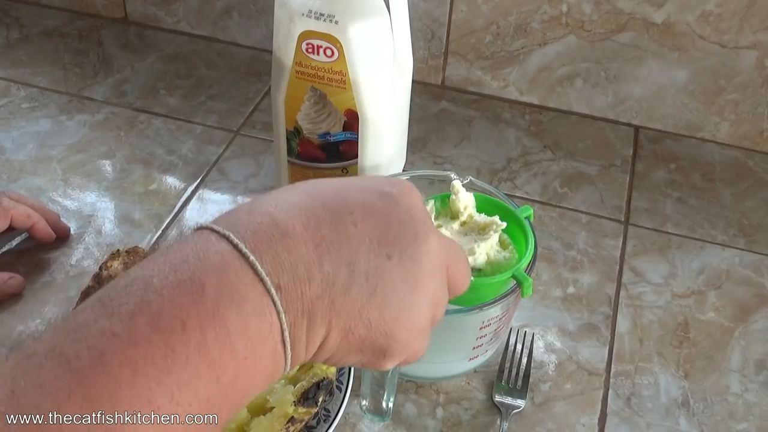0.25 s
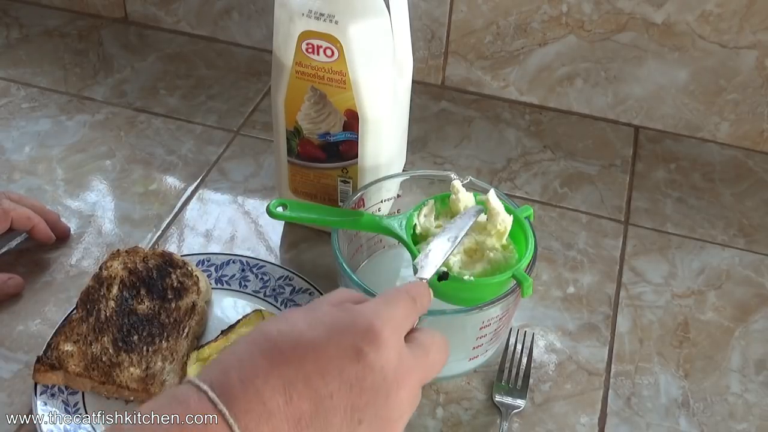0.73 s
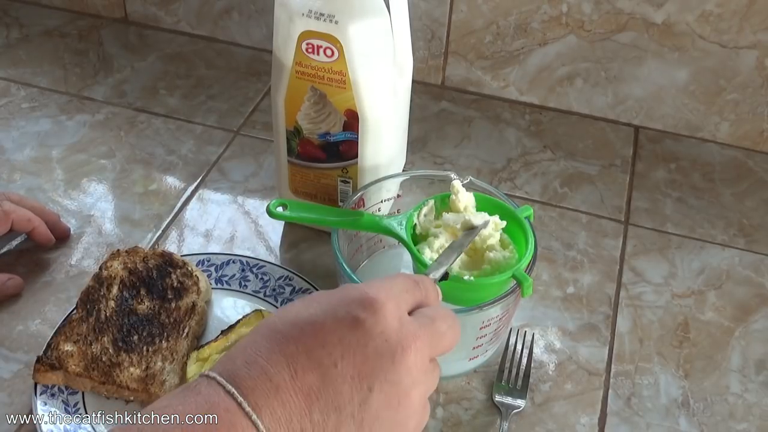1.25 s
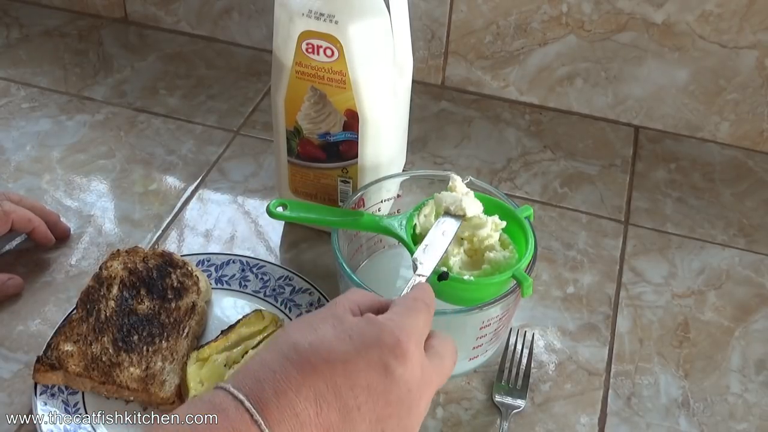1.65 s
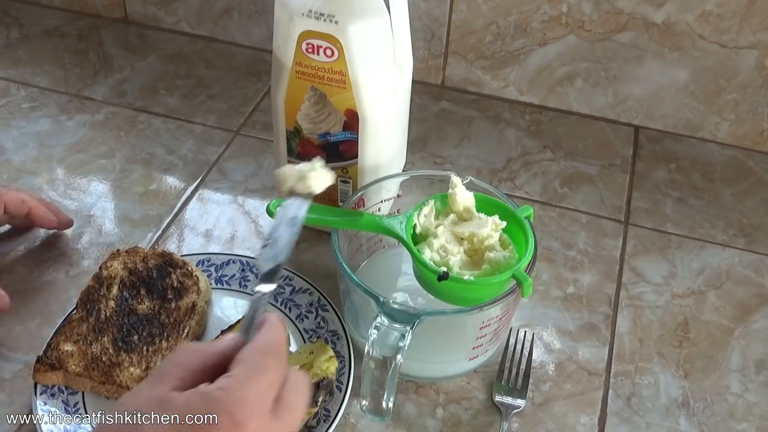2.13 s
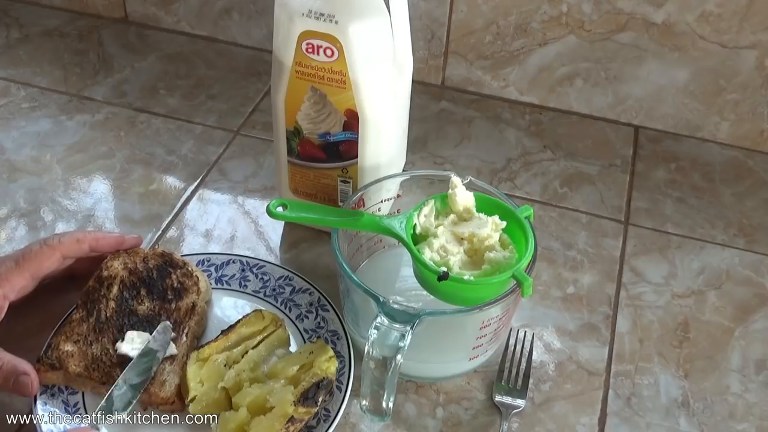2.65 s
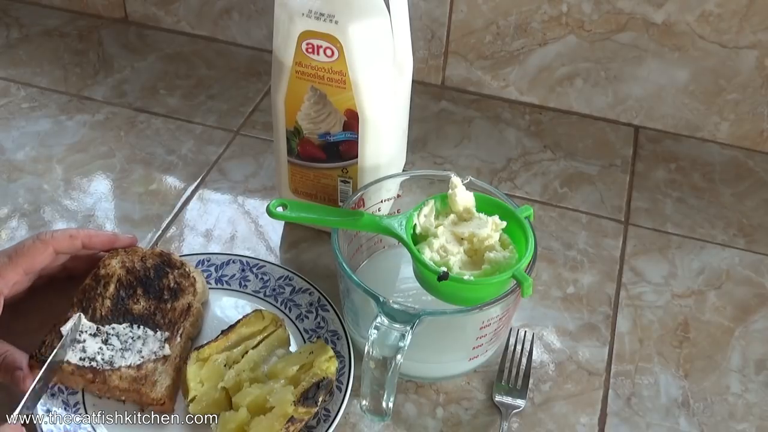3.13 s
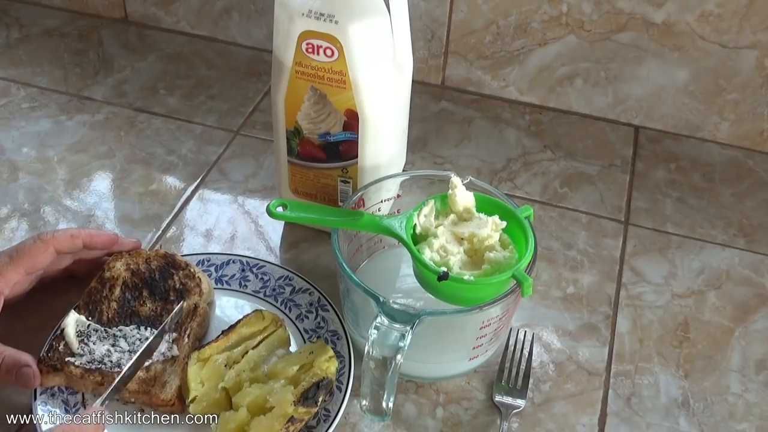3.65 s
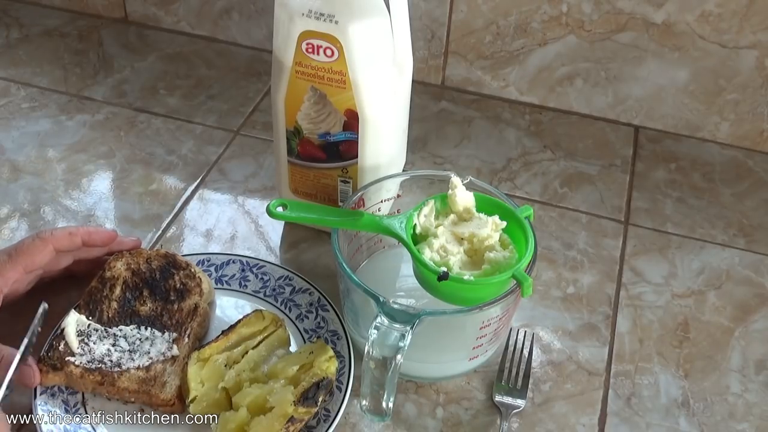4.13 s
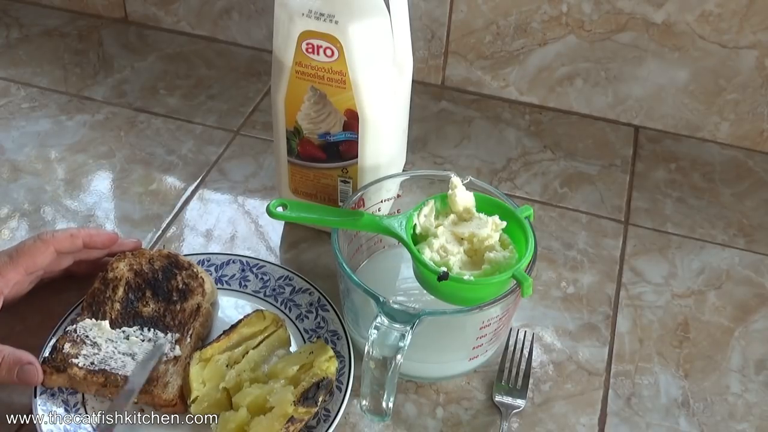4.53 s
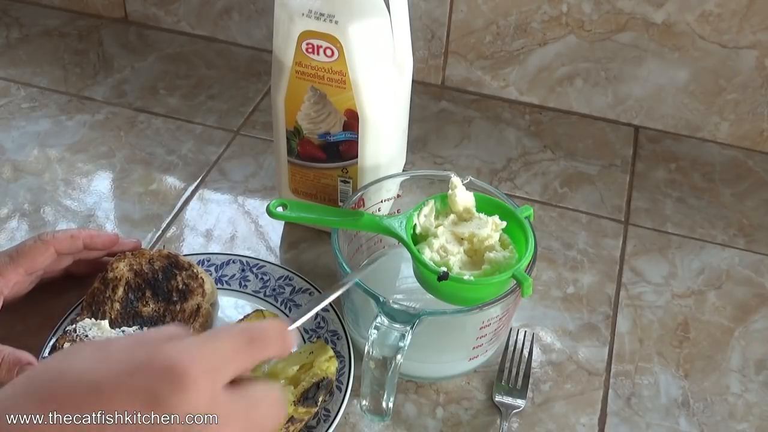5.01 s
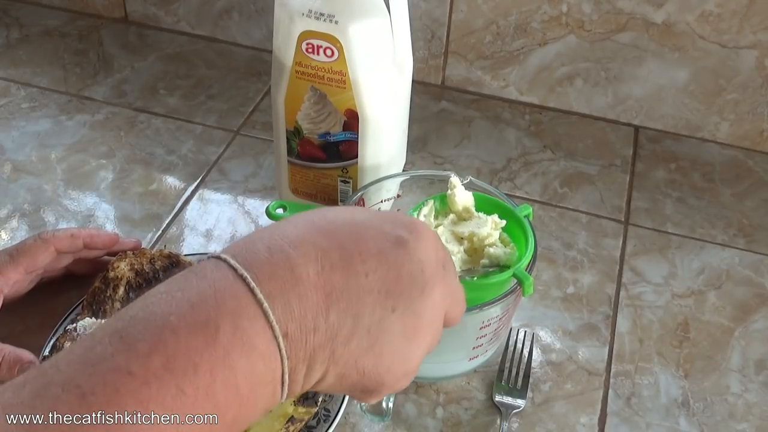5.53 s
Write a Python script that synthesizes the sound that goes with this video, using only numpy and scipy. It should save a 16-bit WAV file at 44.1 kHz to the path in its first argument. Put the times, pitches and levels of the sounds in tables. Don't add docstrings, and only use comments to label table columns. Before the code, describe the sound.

Outdoors in a walled yard, sparrows chirp constantly with a short echo. Close to the microphone, a hand knocks a plastic strainer on a glass jug and rustles softly. Then a knife scrapes hard toast in two crunchy bouts, the second full of fine crumb ticks, before the hand knocks the jug again. Soft puffs of wind come early.

```python
import sys
import numpy as np
from scipy import signal
from scipy.fft import rfft, irfft, next_fast_len
from scipy.io import wavfile
from scipy.ndimage import uniform_filter1d

SR = 44100
rng = np.random.default_rng(int(sys.argv[2]) if len(sys.argv) > 2 else 0)


def generate_wav(sig):
    pcm = np.round(np.clip(np.atleast_2d(sig).T, -1, 1) * 32767).astype(np.int16)
    wavfile.write(sys.argv[1], SR, pcm)


def rack_gain(trim_db):
    fader = np.asarray(trim_db, float)
    return 10 ** (fader / 20)


N = 254533


def rms_one(x):
    return x / np.sqrt(np.mean(x ** 2) + 1e-20)


def bandpass(x, order, low_hz, high_hz):
    return signal.sosfilt(signal.butter(order, [low_hz, high_hz], "band", fs=SR, output="sos"), x)


def level_in(x, low_hz, high_hz):
    part = bandpass(x, 4, low_hz, high_hz)
    return x / np.sqrt(np.mean(part ** 2))


def colour(x, spectrum):
    hz, level_db = np.transpose(spectrum)
    size = next_fast_len(N)
    grid = np.maximum(np.arange(size // 2 + 1) * SR / size, 1)
    gain = rack_gain(np.interp(np.log(grid), np.log(hz), level_db))
    return irfft(rfft(x, size) * gain, size)[..., :N]


def drift(rate_hz):
    r = np.exp(-2 * np.pi * rate_hz / SR)
    wander = signal.lfilter([1], [1, -2 * r, r * r], rng.standard_normal(N + SR))
    return rms_one(wander[SR:])


def swells(rows, column, rise_db_per_s, fall_db_per_s):
    t, rows = np.arange(0, N, 40) / SR, np.array(rows)
    start, end = rows[:, :1], rows[:, :1] + rows[:, 1:2]
    loss_db = rise_db_per_s * np.maximum(start - t, 0) + fall_db_per_s * np.maximum(t - end, 0)
    power = rack_gain(2 * (rows[:, [column]] - loss_db)).sum(axis=0)
    return np.interp(np.arange(N) / SR, t, np.sqrt(power))


def resonances(x, modes):
    out = 0
    for k, (hz, width, level_db) in enumerate(modes):
        r = np.exp(-np.pi * width / SR)
        poles = [1, -2 * r * np.cos(2 * np.pi * hz / SR), r * r]
        ring = signal.lfilter([(1 - r * r) / 2, 0, (r * r - 1) / 2], poles, x)
        out = out + (-1) ** k * rack_gain(level_db) * ring
    return out


def grains(per_s, spread_db, smooth):
    sizes = rack_gain(spread_db * np.minimum(rng.exponential(1, N), 3)) * rng.choice([-1, 1], N)
    born = rng.random(N) < per_s / SR
    clumps = rack_gain(1.5 * np.clip(drift(60), -2, 2))
    return (rms_one(sizes * born) + smooth * rng.standard_normal(N)) * clumps


def echoes(x, t60, side_db, first_s):
    t = np.arange(SR) / SR
    patches = rack_gain(3.5 * rng.standard_normal(SR // 100)).repeat(100)
    scatter = rng.standard_normal((2, SR)) * patches
    tail = scatter * rack_gain(-60 * t / t60) * np.clip(t / first_s, 0, 1)
    tail = tail / np.sqrt(np.sum(tail ** 2, axis=1, keepdims=True))
    mid, side = signal.fftconvolve(x[None], tail, axes=1)[:, :N]
    return mid + rack_gain(side_db) * side * [[1], [-1]]


def whistles(notes, overtone_db, flutter, burr):
    out = np.zeros((2, N))
    breath, shake = np.minimum(drift(135), 2.1), drift(263)
    chance = rng.random((len(notes), 2))
    for (start, length, first, middle, last, peak_db), (side, turn) in zip(notes, chance):
        at = round(max(start, 0) * SR)
        u = np.linspace(-1, 1, round(length * SR))[:N - at]
        now = slice(at, at + len(u))
        hz = middle + u * (last - first) / 2 + u ** 2 * ((first + last) / 2 - middle)
        phase = 2 * np.pi * (np.cumsum(hz * (1 + burr * shake[now])) / SR + turn)
        tone = np.sin(phase) + rack_gain(overtone_db) * np.sin(2 * phase)
        shape = np.abs(np.cos(u * np.pi / 2)) ** 0.15 * rack_gain(peak_db + flutter * breath[now])
        pan = rack_gain(4 * (side - .5) * np.array([[1], [-1]]))
        out[:, now] += tone * shape * pan
    return out


# hz, level_db (per Hz)
AIR_SPECTRUM = [(15, -33), (25, -3.5), (53, -15.5), (94, -9), (308, -8), (800, -11), (1600, -13),
                (2500, -11), (4600, -4), (7000, -14), (10000, -19), (14600, -35.5), (15900, -24.5)]


def air():
    mid, side = colour(rng.standard_normal((2, N)), AIR_SPECTRUM)
    hum = rack_gain(-60.0) * np.sin(2 * np.pi * 49.5 * np.arange(N) / SR)
    bed = rms_one(mid + 0.41 * side * [[1], [-1]])
    return rack_gain(-47) * bed * rack_gain(.9 * drift(1.3)) + hum


# start_s, length_s, pitch_hz, peak_db
RISING = [(.607, 0.037, 6400, -38), (.64, 0.036, 5636, -35), (.723, 0.032, 4230, -36.5),
          (1.076, 0.026, 5290, -31), (1.278, 0.046, 4500, -31.5), (1.614, 0.015, 4760, -39),
          (2.112, 0.045, 4880, -38.5), (2.344, 0.02, 5100, -31), (2.793, 0.017, 4070, -30.5),
          (3.329, 0.017, 5530, -28.5), (3.348, 0.018, 5550, -37), (3.718, 0.0097, 4250, -37),
          (3.815, 0.088, 2960, -57), (3.907, 0.083, 5370, -37.5), (4.024, 0.027, 4270, -28),
          (4.995, 0.057, 4300, -36), (5.378, 0.019, 5080, -33.5), (5.526, 0.02, 6210, -23)]
# start_s, length_s, pitch_hz, peak_db
ARCHED = [(0, 0.035, 4326, -38.5), (0, .07, 3150, -46.5), (.031, 0.029, 4700, -37),
          (1.205, 0.04, 5615, -27), (1.408, 0.029, 5200, -42.5), (1.579, 0.043, 5670, -41),
          (1.656, 0.055, 3920, -44), (1.923, 0.017, 6580, -38.5), (1.949, 0.017, 4670, -34),
          (2.158, 0.027, 2880, -47), (2.357, 0.024, 5756, -23.5), (2.436, 0.023, 4835, -29),
          (1.312, 0.053, 4760, -37), (.396, .05, 5680, -51), (3.394, 0.034, 5640, -41),
          (3.19, 0.03, 4800, -36), (3.575, 0.035, 6830, -46), (3.852, 0.0097, 4420, -42),
          (3.887, 0.016, 6490, -33.5), (3.955, 0.022, 5920, -28.5), (3.985, 0.026, 5700, -33),
          (4.225, 0.02, 6750, -47), (4.518, 0.016, 5700, -38.5), (4.545, 0.038, 5120, -42),
          (4.793, 0.017, 4010, -36), (4.914, 0.055, 5760, -40.5), (5.033, 0.042, 4830, -36.5),
          (5.246, 0.03, 7800, -49), (5.355, 0.022, 6480, -35), (5.606, 0.023, 4940, -21),
          (2.312, 0.023, 7340, -47)]
# start_s, length_s, pitch_hz, peak_db
FALLING = [(.307, 0.015, 4920, -33.5), (.311, 0.029, 3850, -41), (.388, 0.019, 4180, -41),
           (.662, 0.088, 4400, -40), (.788, 0.068, 4960, -35.5), (1.688, 0.028, 6080, -35),
           (1.76, 0.013, 5150, -30.5), (2.436, 0.036, 6570, -36.5), (2.544, 0.022, 4430, -31),
           (3.928, 0.062, 4840, -36), (4.291, 0.046, 4340, -39), (5.549, 0.034, 6130, -29),
           (5.556, 0.015, 5170, -33), (5.657, 0.031, 2980, -41), (5.636, 0.019, 4420, -40)]
# start_s (into the phrase), length_s, first_hz, middle_hz, last_hz, level_db
PHRASE = [
    (0, 0.024, 3460, 4200, 4400, -9.5),
    (0.012, .032, 4690, 4820, 4910, 2.5),
    (0.046, 0.017, 3740, 3694, 3340, -4),
    (.071, .03, 3450, 3670, 3600, -7.5),
    (.1, 0.0246, 3370, 3030, 2620, -17.5),
]
# start_s, level_db, closing_db (extra on the closing notes)
REPEATS = [
    (1.09, -21.5, 4.5),
    (3.343, -19.5, 1.5),
    (4.063, -22, 3.5),
]


def sparrows():
    bends = [(RISING, .9, 1.02), (ARCHED, .975, .99), (FALLING, 1.03, .9)]
    chirps = [(s, length, hz * first, hz, hz * last, peak_db)
              for notes, first, last in bends for s, length, hz, peak_db in notes]
    slurs = [(s + .7 * length, .035, last, last, .74 * last, peak_db - 9.5)
             for s, length, first, middle, last, peak_db in chirps]
    yard = whistles(chirps + slurs, overtone_db=-27, flutter=5, burr=.02)
    phrases = [(at + s, length, first, middle, last, loud_db + level_db + closing_db * (s > .05))
               for at, loud_db, closing_db in REPEATS
               for s, length, first, middle, last, level_db in PHRASE]
    nearest = whistles(phrases, overtone_db=-22, flutter=3.5, burr=.01)
    wet = (rack_gain(-0.5) * yard + rack_gain(-7.0) * nearest).mean(axis=0)
    return rack_gain(-1.5) * yard + nearest + echoes(wet, t60=.52, side_db=-7.5, first_s=.003)


# start_s, length_s, level_db, centre_hz
FLOCK = [(0, 0.16, -33.5, 4900), (0.308, 0.24, -40.5, 4614), (0.668, 0.11, -37.5, 5176),
         (0.807, 0.25, -32, 4606), (1.078, 0.34, -31.5, 4633), (1.686, 0.13, -29.5, 4830),
         (1.888, 0.081, -35, 4900), (2.112, 0.12, -43, 4464), (2.375, 0.13, -33.5, 5110),
         (2.573, 0.31, -31, 4730), (2.97, 0.062, -37.5, 5194), (3.12, 0.098, -26, 5210),
         (3.319, 0.18, -26.5, 4634), (3.63, 0.2, -34, 4790), (3.896, 0.3, -30.5, 4808),
         (4.221, 0.16, -30.5, 4896), (4.466, 0.24, -35, 4750), (4.784, 0.32, -33.5, 4806),
         (5.353, 0.24, -38, 5230), (5.53, 0.24, -39.5, 5490)]


def flock():
    s, length, level_db, centre = np.transpose(FLOCK)
    draw = rng.random((1100, 5))
    start = draw[:, 0] * (N / SR - .05)
    octaves = .7 * (draw[:, 1] + draw[:, 4] - 1.03)
    middle = np.interp(start, s + length / 2, centre) * 2 ** octaves
    first, last = middle * (1 - 0.1873 * draw[:, 3]), middle * (1 - 0.284 * draw[:, 2])
    notes = np.transpose([start, 0.01498 + 0.023 * draw[:, 2], first, middle, last, -6 * draw[:, 3]])
    chatter = whistles(notes, overtone_db=-26, flutter=3, burr=.03).mean(axis=0)
    blur = echoes(chatter, t60=0.21, side_db=-7, first_s=0.1)
    crowding = np.sqrt(uniform_filter1d(np.mean(blur ** 2, axis=0), size=SR // 8) + 1e-4)
    hiss = [(5500, -12), (7200, 1), (10000, 1.0), (13000, -43)]
    breath = rms_one(colour(rng.standard_normal(N), hiss))
    bouts = swells(FLOCK, column=2, rise_db_per_s=340, fall_db_per_s=137)
    return bouts * (rack_gain(-5.5) * blur / crowding + rack_gain(-26.0) * breath)


# start_s, length_s, rustle_db, fine_hiss_db
RUMMAGE = [(0, 0.015, -52.5, -62), (.125, 0.077, -42, -52.5), (.3, 0.13, -58.5, -60.5),
           (.92, 0.042, -49.5, -52), (1.12, 0.032, -48.5, -42), (1.23, 0.076, -53.5, -51),
           (1.39, 0.14, -54, -60), (1.51, 0.023, -69, -76), (1.68, 0.062, -85, -51),
           (1.79, 0.094, -53, -65), (2.36, 0.14, -84, -52.5), (2.95, 0.14, -63, -58),
           (3.93, 0.2, -58.5, -50), (4.15, 0.069, -56.5, -80), (5.51, 0.024, -50.5, -53.5)]
# hz, level_db (per Hz)
RUSTLE_SPECTRUM = [(250, -3), (500, 2), (1000, -0.5), (2000, -3), (3500, -6.5), (7000, -30)]
# pitch_hz, level_db, t60_s
JUG = [(735, 5, 0.16), (815, 6, 0.16), (900, 1, 0.06), (1700, 14, 0.045), (2300, 14, 0.025),
       (2690, 11, 0.05), (3480, 12, 0.028), (4500, 9, 0.02), (6500, 3, .05)]


def rummaging():
    touch = grains(1500, 3.3, smooth=2.04)
    body = resonances(touch, [(hz, 120.0, level_db) for hz, level_db, t60 in JUG])
    rustle = level_in(colour(touch + rack_gain(-5.0) * body, RUSTLE_SPECTRUM), 1070, 3100)
    fine = colour(touch, [(5000, -18), (8000, 5.0), (11000, -2.0), (15500, -30)])
    fine = level_in(fine, 11600, 18500)
    rustle_moves = swells(RUMMAGE, column=2, rise_db_per_s=264, fall_db_per_s=165)
    fine_moves = swells(RUMMAGE, column=3, rise_db_per_s=304, fall_db_per_s=128.5)
    return rustle_moves * rustle + rack_gain(-13.5) * fine_moves * fine


# start_s, peak_db, low_share_db, hollow_db (extra on the jug's hollow ring)
KNOCKS = [
    (.077, -24, 0.5, 0),
    (.102, -27.5, 0, 1),
    (.1225, -14, -33, -1),
    (.833, -38, 4, 0),
    (2.975, -24.5, -17, -1),
    (5.3555, -18, -75, 7),
    (5.4025, -22, -66, -2),
]


def knocks():
    out, t = np.zeros(N), np.arange(SR // 5) / SR
    chance = rng.standard_normal((len(KNOCKS), len(JUG)))
    crack = bandpass(rng.standard_normal((len(KNOCKS), len(t))), 3, 900, 6500)
    contact = np.minimum(t / .001, 1)
    thud = np.sin(2 * np.pi * 270 * t) * rack_gain(-60 * t / 0.031)
    for k, (s, peak_db, low_db, hollow_db) in enumerate(KNOCKS):
        rings = 0
        for (hz, level_db, t60), c in zip(JUG, chance[k]):
            ring_db = level_db + 2 * c + hollow_db * (hz < 1e3) - 60 * t / t60
            rings = rings + rack_gain(ring_db) * np.sin(2 * np.pi * hz * t)
        bright = rings / np.abs(rings).max() + .7 * crack[k] * rack_gain(-60 * t / .018)
        share = np.clip(rack_gain(low_db / 2), 0, 1)
        hit = rack_gain(peak_db) * contact * ((1 - share) * bright + share * thud)
        at = round(s * SR)
        out[at:at + len(t)] += hit[:N - at]
    return out


# start_s, length_s, level_db
GUSTS = [
    (.08, 0.035, -49),
    (.24, 0.25, -43.5),
    (.63, 0.15, -42),
    (.9, 0.29, -56.5),
    (1.18, 0.048, -46),
    (1.3, 0.033, -35),
    (1.36, 0.023, -38),
    (2.33, 0.078, -53),
]


def wind():
    rumble = [(15, -7), (35, -0.5), (90, -1.5), (200, -12.5), (500, -35.5), (2000, -80)]
    mid, side = colour(rng.standard_normal((2, N)), rumble)
    ports = mid + .2 * side * [[1], [-1]]
    lumps = rack_gain(4.1 * drift(4.8))
    return swells(GUSTS, column=2, rise_db_per_s=169, fall_db_per_s=303) * rms_one(lumps * ports)


# start_s, length_s, peak_db, sharp_hz (above the usual pitch)
UPPER_STEPS = [(2.017, 0.099, -52, -1), (2.126, 0.024, -43, -3), (2.24, 0.11, -56.5, 0),
               (2.411, 0.092, -49, 73), (2.57, 0.1, -53, 1), (2.77, 0.12, -48, -1.5),
               (2.96, 0.15, -58.5, -6), (3.07, 0.13, -52, 11.5), (3.28, 0.11, -49, 4),
               (3.53, 0.063, -47, 1), (3.64, 0.057, -64, -13), (3.75, 0.09, -49.5, 0),
               (4.021, 0.049, -55.5, -11), (4.16, 0.11, -53, -92), (4.31, 0.087, -54, 24),
               (4.41, 0.069, -48.5, 10), (4.5, 0.065, -52.5, -88), (4.62, 0.13, -53, -39.5),
               (4.75, 0.11, -58, -36.5), (4.89, 0.11, -56.5, -23), (5.05, .1, -76, -16)]
# start_s, peak_db
LOWER_STEPS = [
    (1.991, -47),
    (2.174, -48),
    (2.257, -49),
    (2.408, -47),
    (2.97, -57),
    (3.687, -50.5),
    (4.139, -60),
    (4.235, -49.5),
    (4.854, -54),
]


def low_bird():
    begin = LOWER_STEPS[0][0]

    def tiring(s, fresh_hz, tired_hz, tiring_s):
        return tired_hz + (fresh_hz - tired_hz) * np.exp((begin - s) / tiring_s)

    upper = [(s, length, sharp + tiring(s, 1308, 1119, 0.24), -.008, peak_db)
             for s, length, peak_db, sharp in UPPER_STEPS]
    lower = [(s, 0.047, tiring(s, 1033, 933, 0.81), .07, peak_db) for s, peak_db in LOWER_STEPS]
    notes = [(s, length, hz * (1 - bend), hz, hz * (1 + bend), peak_db)
             for s, length, hz, bend, peak_db in upper + lower]
    calls = whistles(notes, overtone_db=-42, flutter=3, burr=.009)
    return rack_gain(2.0) * calls + rack_gain(1.0) * echoes(calls.mean(axis=0), 1.0, side_db=-3.5, first_s=0.0054)


# start_s, length_s, hiss_db, crunch_db
STROKES = [(2.58, 0.054, -66, -59), (2.70, 0.026, -54.5, -49.5), (2.785, 0.034, -63, -47.5),
           (2.815, 0.028, -61, -44), (2.848, 0.016, -51, -33.5), (2.882, 0.02, -43.5, -32.5),
           (3.082, 0.0034, -50.5, -35), (3.101, 0.0094, -42.5, -37), (3.119, 0.021, -41, -36),
           (3.156, 0.027, -40.5, -35), (3.197, 0.018, -45.5, -44), (3.219, 0.031, -47, -45.5),
           (3.33, 0.02, -59.5, -66), (3.388, 0.048, -55, -35.5), (3.418, 0.069, -45, -38.5),
           (3.512, 0.026, -47.5, -44), (4.305, 0.01, -63, -63), (4.325, 0.032, -54, -50),
           (4.395, 0.0062, -58.5, -47.5), (4.437, .006, -60, -51), (4.457, 0.022, -55, -46),
           (4.50, 0.067, -64.5, -57), (4.58, 0.015, -60, -43), (4.61, 0.066, -62.5, -42),
           (4.682, 0.035, -60, -36), (4.725, 0.1, -54, -46), (4.848, 0.035, -58, -53)]
# pitch_hz, width_hz, level_db
BLADE = [(6600, 250, -3), (8610, 130, 2), (10940, 130, 2), (13300, 110, 13), (15550, 200, 24)]
# pitch_hz, width_hz, level_db
TOAST = [(879, 50, 8), (1390, 29, 5), (1740, 175, 11), (1964, 550, -3), (2630, 400, 9.5), (2980, 160, -5)]
# hz, level_db (per Hz)
HISS_SPECTRUM = [(1500, -11), (2600, 0.5), (4200, 0.5), (6800, -1), (9000, 2), (11000, -8.5), (12500, -16),
                 (15900, -58.5)]
# hz, level_db (per Hz)
CRUNCH_SPECTRUM = [(300, -4.5), (600, 4), (1200, 16), (2000, 16.5), (3500, -67), (7000, 7.5)]


def spreading():
    bite_db_per_s = 3500
    pressure = swells(STROKES, column=2, rise_db_per_s=bite_db_per_s, fall_db_per_s=714)
    crushing = swells(STROKES, column=3, rise_db_per_s=bite_db_per_s, fall_db_per_s=600)
    skimming = 1 / (1 + pressure / rack_gain(-47))
    ticks = grains(330, 1.2, smooth=0) * 1.15 * skimming
    chatter = rack_gain(1.9 * drift(55))
    edge = grains(4000, 2.4, smooth=.9) * (1 - .6 * skimming) * chatter + ticks
    crumbs = grains(1600, 3.0, smooth=.6) * chatter
    blade = rack_gain(7 + 5 * skimming) * resonances(edge, BLADE)
    hiss = level_in(colour(edge + blade, HISS_SPECTRUM), 11500, 15000)
    both = crumbs + 2.6 * edge
    slice_tones = sum(rack_gain(4 * drift(9)) * resonances(both, [mode]) for mode in TOAST)
    crunch = level_in(colour(both, CRUNCH_SPECTRUM) + rack_gain(7.5) * slice_tones, 620, 3300)
    return pressure * hiss + crushing * crunch + snaps()


# start_s, length_s, hum_db, rub_db
TABLE = [
    (2.61, 0.14, -98, -45.5),
    (2.73, 0.037, -55.5, -52),
    (2.9, 0.071, -54.5, -52.5),
    (3.08, 0.19, -68, -54.5),
    (5.52, 0.072, -58.5, -49),
    (5.65, 0.14, -53.5, -51.5),
]


def table():
    rub = rng.standard_normal(N)
    hum = rms_one(resonances(resonances(rub, [(156, 15, 0)]), [(156, 13, 0)]))
    drag = colour(rub, [(120, -24.0), (220, -20.0), (600, -23), (1200, -26), (4000, -65)])
    drag = level_in(drag, 200, 900)
    hum_presses = swells(TABLE, column=2, rise_db_per_s=152, fall_db_per_s=76)
    rub_presses = swells(TABLE, column=3, rise_db_per_s=313, fall_db_per_s=128)
    return hum_presses * hum + rack_gain(-4) * rub_presses * drag


# start_s, peak_db
SNAPS = [(2.7062, -38), (2.7875, -30), (2.814, -35), (2.884, -25), (2.92, -25), (2.9334, -31),
         (3.0824, -28), (3.103, -17), (3.1733, -13), (3.3897, -30), (3.4055, -28), (3.5198, -13),
         (4.3131, -34), (4.3266, -38), (4.3324, -39), (4.3974, -36), (4.4368, -32), (4.4634, -25),
         (4.4677, -21), (4.5294, -45), (4.5585, -38), (4.579, -24), (4.595, -24), (4.6139, -36),
         (4.631, -26.5), (4.6458, -27), (4.673, -30), (4.687, -18), (4.7066, -23), (4.7145, -36),
         (4.7414, -38), (4.7614, -30), (4.7744, -27), (4.7995, -25), (4.7995, -19), (4.8125, -33),
         (4.8356, -18), (4.8466, -19), (4.8614, -20), (4.8766, -25)]


def snaps():
    out, t = np.zeros(N), np.arange(SR // 100) / SR
    bursts = rng.standard_normal((len(SNAPS), len(t))) * rack_gain(-60 * t / .0035)
    for (s, peak_db), burst in zip(SNAPS, bursts):
        at = round(s * SR)
        out[at:at + len(t)] += rack_gain(peak_db) * burst
    out = out + resonances(out + 1e-18, [(hz, width, 14) for hz, width, level_db in BLADE[1:4]])
    return rack_gain(-2) * bandpass(out, 2, 2500, 12500)


def scene():
    near = spreading() + rummaging() + table() + knocks()
    placed = near * rack_gain(np.array([[.3], [-.3]]))
    near = placed + rack_gain(-9.5) * echoes(near, 0.07, side_db=-3, first_s=0.012)
    return near + sparrows() + flock() + low_bird() + wind() + air()


def band_limit(x):
    return signal.sosfilt(signal.butter(12, 15870, fs=SR, output="sos"), x)


def record(dry):
    top = signal.cheby2(14, 60, 16350, fs=SR, output="sos")
    mix = signal.sosfilt(top, dry)
    return band_limit(mix)


dry = scene()
out = record(dry)
generate_wav(out)
```